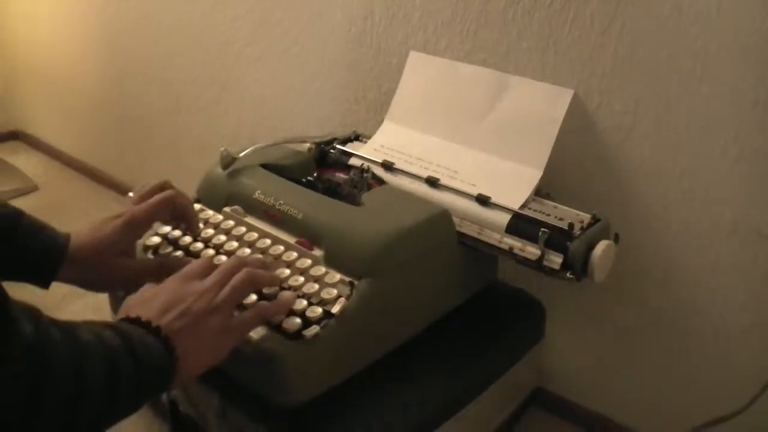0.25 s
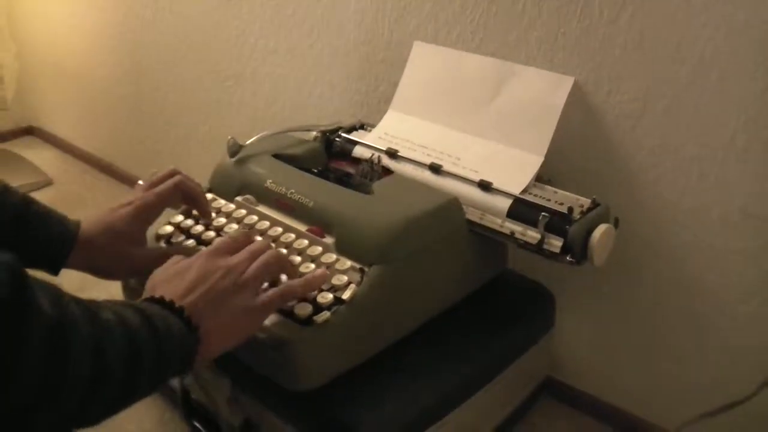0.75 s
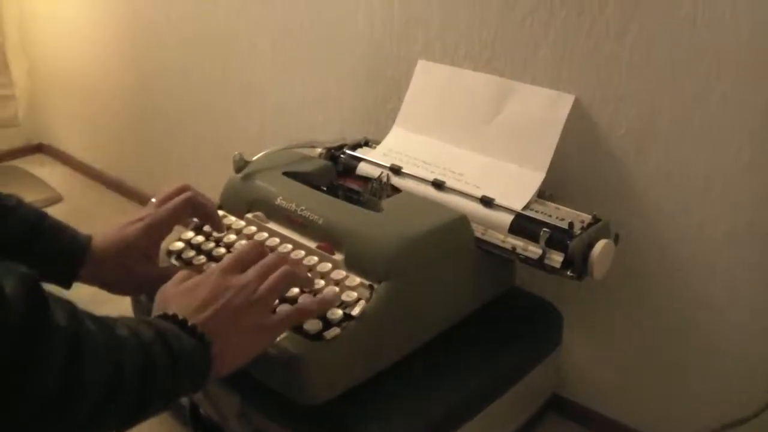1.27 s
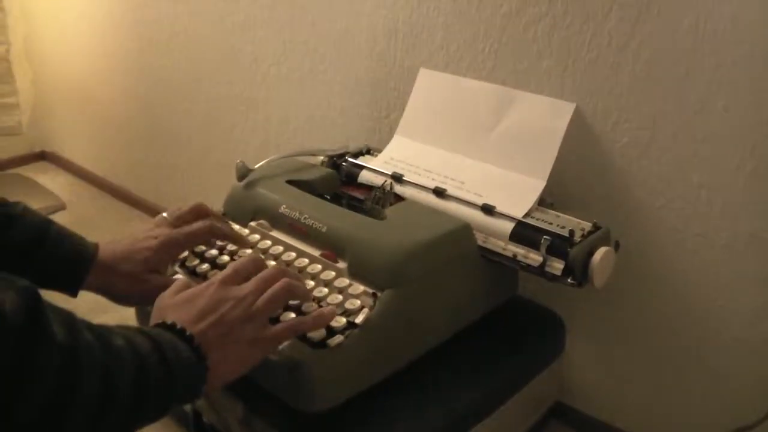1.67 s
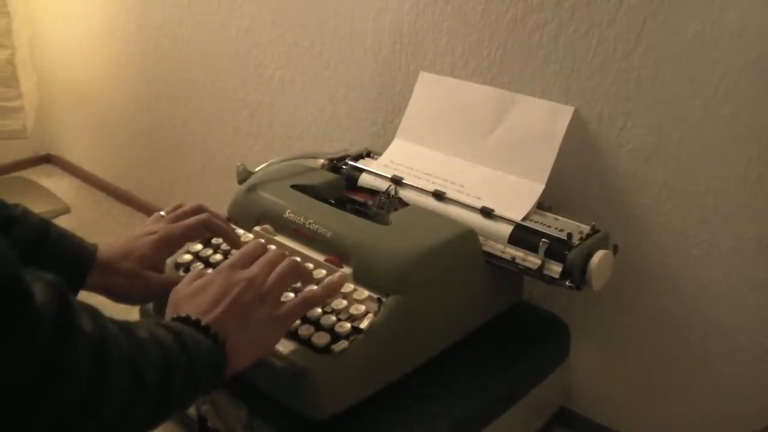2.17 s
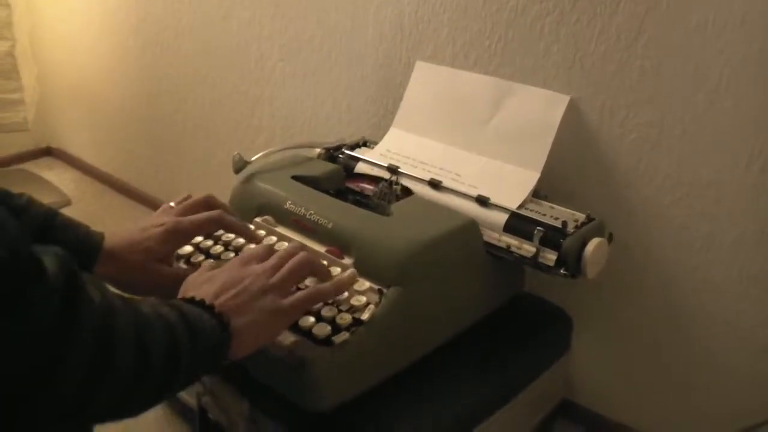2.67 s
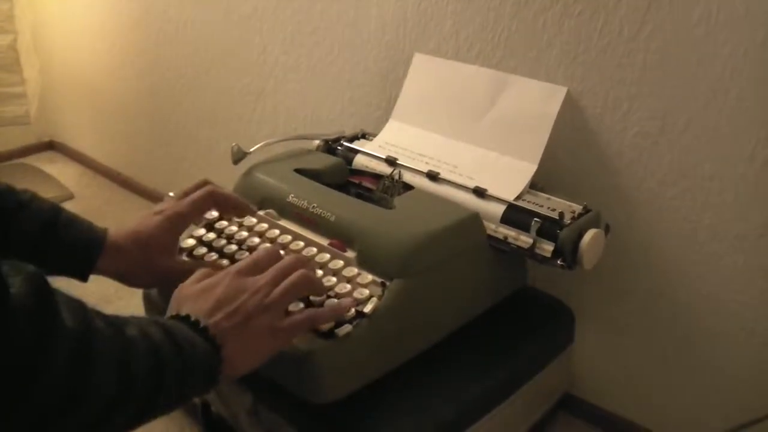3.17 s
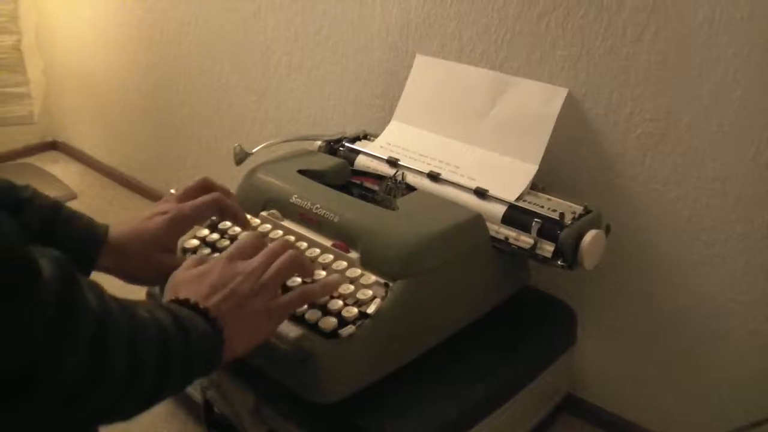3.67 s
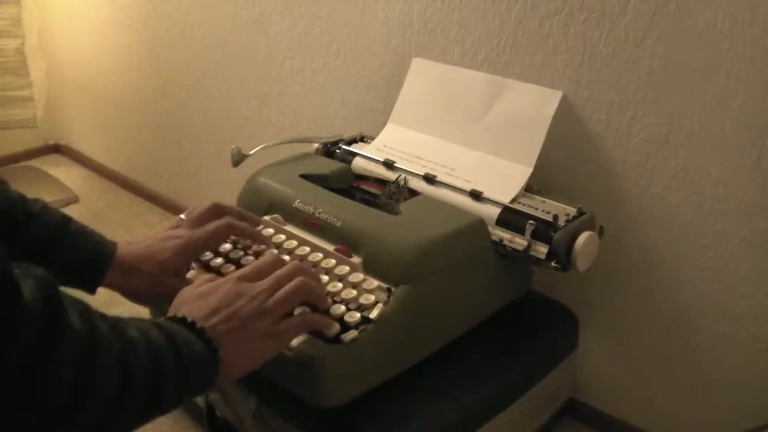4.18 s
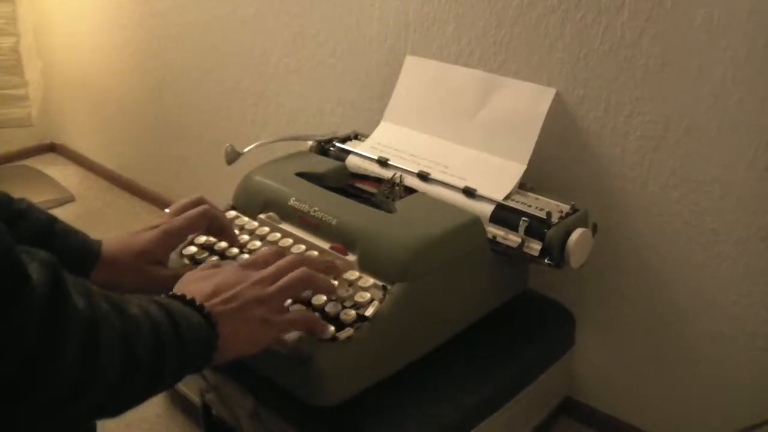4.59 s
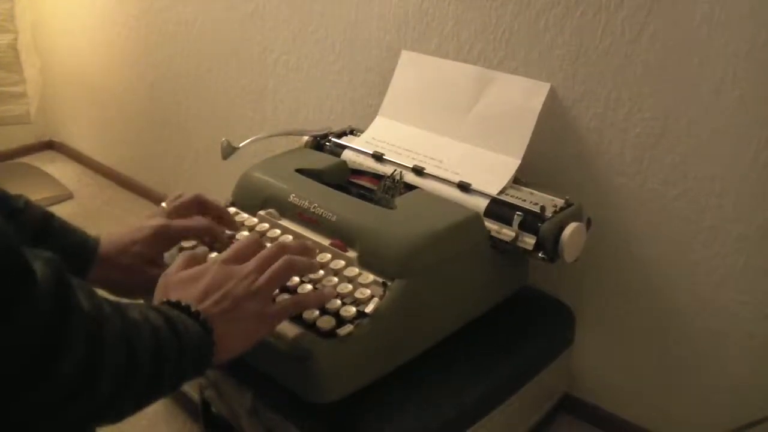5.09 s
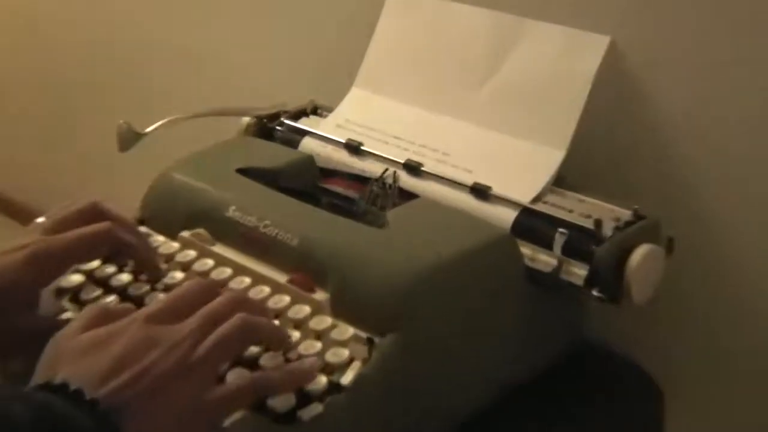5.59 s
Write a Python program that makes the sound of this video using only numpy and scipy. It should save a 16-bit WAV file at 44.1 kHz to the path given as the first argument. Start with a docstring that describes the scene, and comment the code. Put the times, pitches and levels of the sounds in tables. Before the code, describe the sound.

Close, loud typing on an electric typewriter in a small, hard-walled room. Each key gives a light mechanical rattle, a sharp crack on the roller, and a quick clatter as the bar falls back. Spaces clunk and bounce between runs of letters, and one deep shift thump booms past four seconds. A low motor hum fills the pauses; the microphone ducks and clips slightly on peaks.

```python
"""Electric typewriter in a small room

Each key lets the power roller fling a type bar, which cracks against the platen and falls back;
the ceiling and walls answer every crack. Space bar, carriage and shift clunk in between, as filtered
noise bursts and struck modes, over the motor's wavering sine hum and a bed of coloured noise.
A gain control ducks after loud peaks, and what outruns it clips."""
import sys
import numpy as np
from scipy import signal
from scipy.fft import rfft, irfft, next_fast_len
from scipy.io import wavfile
from scipy.ndimage import minimum_filter1d, map_coordinates

SR = 44100
rng = np.random.default_rng(int(sys.argv[2]) if len(sys.argv) > 2 else 0)


def to_wav(s):
    """Save 16-bit WAV."""
    ch = np.atleast_2d(s).T  # columns
    pcm = np.round(np.clip(ch, -1, 1) * 32767)  # PCM
    wavfile.write(sys.argv[1], SR, pcm.astype(np.int16))


N = 257544
TIME = np.arange(N) / SR

# Levels in the tables are relative: each layer trims them further.
# Letters typed: [strike t/s, strike level/dB, linkage drive level/dB, frame knock level/dB]
LETTERS = [(-.036, 7, -39, -23), (0.1117, 17, -24.5, -27), (0.4262, 15.5, -15.5, -19.5),
           (0.583, 13.5, -16.5, -21.5), (0.7156, 14, -19.5, -24), (0.8858, 9.5, -16, -20),
           (1.431, 14, -17.5, -20.5), (1.6163, 12, -17, -17.5), (1.8015, 13.5, -16, -21.5),
           (1.947, 13.5, -23.5, -21.5), (2.12, 13.5, -19, -17.5), (2.2068, 12.5, -23, -28),
           (2.4368, 13.5, -14.5, -18.5), (2.5227, 12, -18.5, -23), (2.7118, 12.5, -20.5, -18),
           (3.4537, 11, -15, -19), (3.627, 14, -16.5, -18), (3.726, 12.5, -26, -31),
           (3.9166, 16, -18.5, -18.5), (4.374, 14, -18.5, -17.5), (4.79, 16, -19, -20),
           (4.8349, 15, -40, -36), (5.0194, 11.5, -17.5, -19), (5.1943, 16, -17, -23.5),
           (5.6348, 12, -18, -22.5), (5.752, 13, -22.5, -27.5), (5.827, 14, -39, -36)]
# Resonances of the cast frame: [f/Hz, width/Hz, level/dB]
FRAME_MODES = [(345, 30, -3), (455, 34, 2), (522, 35, -4), (640, 55, -7), (767, 55, .5), (870, 60, -4),
               (955, 50, -7), (1185, 40, -10), (1312, 35, -7)]
# The case booming on its stand: [f/Hz, level/dB, t60/s]
STAND_MODES = [(150.8, -5, 0.26), (222.2, -11.5, 0.11), (341.1, -6.5, 0.14)]
# The stand itself rocking: [f/Hz, level/dB, t60/s]
SWAY_MODES = [(58, -27, 0.15), (90, 2, 0.21)]
# Carriage rails and springs: [f/Hz, level/dB, t60/s]
SPRING_MODES = [(1610, -5, .09), (2186, -9, .07), (2850, -1, .085), (3623, -5, .08), (4314, -7, .07),
                (4775, -5, .08), (7311, -11, .06), (8554, -9, .06)]
# Broad colour of a crack on the platen: [f/Hz, level/dB]
CRACK_COLOUR = [(100, -44), (500, 1.5), (900, -20), (1300, -12.5), (2400, -5.5), (3100, -7.5), (3900, -1.5),
                (5200, 0), (6200, -1.5), (7200, -3), (9500, -6), (12500, -14.5), (15000, -9.5)]

SWING_S = .0315  # from the cam's catch to the strike


def amp(db):
    """Decibels to linear gain."""
    return 10 ** (np.asarray(db) / 20)


def unit(x):
    """Scale to an RMS of 1."""
    return x / np.sqrt(np.mean(x ** 2) + 1e-20)


def along(points, hz):
    """Interpolate (f/Hz, value) points on a log frequency axis."""
    f, v = np.transpose(points)
    return np.interp(np.log(hz + 1), np.log(f + 1), v)


def wobble(rate):
    """A smooth random curve with `rate` knots a second."""
    steps = np.arange(0, N, 8)
    knots = rng.standard_normal(int(N * rate / SR) + 4)
    curve = map_coordinates(knots, [steps * rate / SR])
    return np.interp(np.arange(N), steps, curve)


def filtered(x, response):
    """Multiply the spectrum of x by a response of frequency."""
    n = x.shape[-1]
    m = next_fast_len(n + 8192)
    hz = np.fft.rfftfreq(m, 1 / SR)
    return irfft(rfft(x, m) * response(hz), m)[..., :n]


def causal(points, size=1024):
    """The minimum-phase click of a spectrum: its energy comes as early as possible."""
    hz = np.fft.rfftfreq(size, 1 / SR)
    cepstrum = irfft(np.log(amp(along(points, hz))))
    # fold the cepstrum onto positive times
    cepstrum[1:size // 2] *= 2
    cepstrum[size // 2 + 1:] = 0
    return irfft(np.exp(rfft(cepstrum)))


def convolved(x, response):
    """Convolve both channels, keeping the length of the track."""
    return signal.fftconvolve(x, response, axes=1)[:, :N]


def noise_pair(n):
    """Stereo white noise: nearly alike in the bass, wider in the treble."""
    # stereo width, side against mid: [f/Hz, level/dB]
    side_level = [(30, -20), (70, -50), (600, -19), (2200, -30), (4500, -9.5), (8000, -4), (13000, -4.5)]
    mid, side = rng.standard_normal((2, n))
    side = filtered(side, lambda hz: amp(along(side_level, hz)))
    return np.array([mid + side, mid - side])


def coloured(x, points):
    """Give x a broad colour that keeps the power of white noise."""
    click = causal(points)
    click = click[None] / np.linalg.norm(click)
    return signal.fftconvolve(x, click, axes=1)[:, :x.shape[1]]


def ringing(x, modes):
    """Pass x through parallel resonances of alternating sign that keep the power of white noise."""
    def response(f):
        total = 0
        for k, (centre, width, db) in enumerate(modes):
            damping = 1j * f * width
            total = total + (-1) ** k * amp(db) * damping / (centre ** 2 - f ** 2 + damping)
        return total / np.sqrt(np.mean(np.abs(total) ** 2) + 1e-20)
    return filtered(x, response)


def ring(modes, rise, scatter_db=2):
    """Modes set ringing by one push, at new strengths and slightly new pitches each time."""
    hz, db, t60 = np.transpose(modes)[:, :, None]
    t = TIME[:int(t60.max() * SR)]
    size = amp(db + scatter_db * rng.standard_normal(db.shape))
    hz = hz * (1 + .006 * rng.standard_normal(hz.shape))
    decay = np.exp(-np.log(1000) * t / t60)
    tone = np.sum(size * decay * np.sin(2 * np.pi * hz * t), axis=0)
    return np.pad((1 - np.exp(-t / rise)) * tone, (0, SR // 4))[:SR // 4]


def burst(db, rise, t60, hold=0):
    """Power of a rattle that builds, holds and dies."""
    t = TIME[:SR // 3]
    build = (1 - np.exp(-t / rise)) ** 2
    decay = np.exp(-np.log(1e6) * np.maximum(t - hold, 0) / t60)
    return amp(db) ** 2 * build * decay


def rattle(power, grain_db):
    """Noise of uneven size under a power envelope, like many tiny contacts."""
    grain = unit(amp(grain_db * wobble(600)))
    return np.sqrt(power) * grain * noise_pair(N)


def add(track, s, sound):
    """Mix a sound into a track at a time in seconds."""
    i = round(s * SR)
    part = sound[..., max(-i, 0):max(N - i, 0)]
    track[..., max(i, 0):max(i, 0) + part.shape[-1]] += part


def room_tail(grain_db=3):
    """The walls' answer, of energy 1 at left: uneven reflections, each band with its own decay."""
    # the room's decay: [f/Hz, t60/s]
    room_decay = [(150, 0.81), (1000, 0.29), (5000, 0.22), (9000, 0.21), (15000, 0.35)]
    n = SR // 2
    hz, t, z = signal.stft(noise_pair(n), SR, nperseg=256)
    decay = amp(-60 * t / along(room_decay, hz)[:, None])
    tail = signal.istft(z * decay, SR, nperseg=256)[1][:, :n]
    uneven = np.interp(TIME[:n], np.arange(500) / 1000, rng.standard_normal(500))
    tail = tail * amp(grain_db * uneven) * (1 - np.exp(-TIME[:n] / 0.024))
    return tail / np.linalg.norm(tail[0])


def strikes():
    """The slug cracks on the platen; the ceiling returns a recoloured click and the room rings on."""
    # type bar and guide, ringing under the blow: [f/Hz, level/dB, t60/s]
    slug_modes = [(3010, 6.5, 0.018), (5020, -5.5, 0.04), (5700, -2, 0.03), (6790, 6, 0.0043)]
    # colour of the ceiling's reflection: [f/Hz, level/dB]
    ceiling_colour = [(200, -27.5), (1200, -5), (3200, -8), (4300, -10.5), (5100, -3.5), (6000, -6.5),
                      (7200, -11.5), (13000, -17.5)]
    # lag of the ceiling's echo, drifting over the scene: [t/s, lag/s]
    echo_lag = [(0, .0099), (.4, .0104), (1.5, .0104), (2, .0097), (2.5, .0095), (5.8, .0094)]
    out, t = np.zeros((2, N)), TIME[:SR // 40]
    ceiling = causal(ceiling_colour)[None]
    click = coloured(signal.unit_impulse(len(t))[None], CRACK_COLOUR)
    for s, db, *_ in LETTERS:
        # the blow itself, the ring of the type bar, and its scatter off the nearby metal
        bar_ring = ring(slug_modes, rise=.0001)[:len(t)]
        scatter = coloured(noise_pair(len(t)), CRACK_COLOUR) * amp(-60 * t / 0.026)
        crack = amp(db - 1) * (0.96 * click + 0.089 * bar_ring + 0.25 * scatter)
        add(out, s, crack)
        lag = np.interp(s, *np.transpose(echo_lag))
        add(out, s + lag, amp(6) * signal.fftconvolve(crack, ceiling, axes=1))
        reflected = signal.fftconvolve(click, ceiling)
        add(out, s, amp(db + 16) * signal.fftconvolve(reflected, room_tail(grain_db=3.5), axes=1))
    return out


def mechanism():
    """Cams, levers and carriage shake the steel linkage, the frame and the stand."""
    # resonances of levers and type bars: [f/Hz, width/Hz, level/dB]
    steel_modes = [(2276, 94, -6.5), (2786, 26, -1), (3100, 130, -8), (3337, 120, -3.5), (3575, 360, -3.5),
                   (4020, 540, -8), (4270, 37, 0), (4730, 43, 3), (4920, 105, -7), (5276, 190, -3),
                   (5476, 270, -4.5), (5910, 210, -8.5)]
    # broad colour of the clattering linkage: [f/Hz, level/dB]
    clatter_colour = [(200, -5.5), (700, -5), (1600, 1.5), (2100, -1.5), (3300, -0.5), (5300, -3.5),
                      (6600, -5.5), (8300, -5.5), (9600, -9.5), (10800, -9), (12200, -15), (15000, -18)]
    # broad colour of knocks in the casting: [f/Hz, level/dB]
    knock_colour = [(30, -26), (180, -13), (330, -1.5), (800, 1.5), (1500, -11.5), (3000, -5.5),
                    (8000, -40)]
    # steel and frame are power envelopes; tones and chime are already sound
    steel, frame, tones, chime = letters() + spaces() + shift()
    clatter = amp(-4.5) * rattle(steel, grain_db=0.5) + amp(-8) * ticks(steel)
    linkage = coloured(clatter, clatter_colour)
    linkage = linkage + amp(-4) * ringing(rattle(steel, grain_db=4), steel_modes)
    casting = amp(-2) * ringing(rattle(frame, grain_db=2.5), FRAME_MODES)
    casting = casting + amp(-3) * coloured(rattle(frame, grain_db=0), knock_colour)
    # the rings come from inside the case and arrive as much by way of the walls as directly
    rings = .7 * (chime + convolved(chime[None], room_tail()))
    near = linkage + casting
    return near + rings + tones + amp(-10) * convolved(near, room_tail())


def letters():
    """Finger, cam, ribbon lift and the bar's return: the same chain of contacts for every letter."""
    # a type bar shivering in its basket: [f/Hz, level/dB, t60/s]
    bar_modes = [(2320, -2, .08), (3135, -1, .07), (3415, -2, .08), (4885, 0, .1), (5940, -4, .07)]
    # the finger lands before the cam catches; the other times follow the strike
    finger_lead_s, fall_s, settle_s, reset_s = 0.017, .043, .07, 0.125
    fall_db = -22
    steel, frame, tones, chime = np.zeros((4, N))
    thump = ring(STAND_MODES, rise=0.0079, scatter_db=6)  # one boom shared by all letters
    for s, _, drive_db, knock_db in LETTERS:
        cam = s - SWING_S
        # the finger lands on the key top
        finger = cam - finger_lead_s
        add(steel, finger, burst(drive_db - 8.5, 0.0025, 0.15, hold=0.012))
        add(frame, finger, burst(knock_db - 13, 0.0043, 0.14, hold=0.0037))
        # the cam snaps onto the roller a fixed time before the strike and drives the bar up
        add(steel, cam, burst(drive_db + 4.5, 0.00055, 0.017, hold=0.0055))
        add(steel, cam, burst(drive_db, 0.0091, 0.34, hold=0.027))
        add(frame, cam, burst(knock_db + 0.28, 0.0011, 0.018, hold=0.024))
        add(tones, cam, amp(knock_db - 5.5) * thump + amp(knock_db) * knock())
        add(chime, cam, amp(drive_db - 2.5) * ring(bar_modes, rise=0.0013))
        add(chime, cam, amp(drive_db - 12.5) * lever())
        # the ribbon lifts and the escapement trips just ahead of the strike
        add(steel, s - .007, burst(-14.5, 0.0018, 0.019, hold=0.0033))
        # the bar drops back into its basket
        fall = s + fall_s
        add(steel, fall, burst(fall_db - 6, 0.0028, 0.77))
        add(chime, fall, amp(fall_db - 2.5) * ring(bar_modes, rise=0.0012))
        add(chime, fall, amp(fall_db - 3) * lever())
        add(frame, fall, burst(fall_db + 1, 0.008, 0.1, hold=0.008))
        # its lever settles
        add(tones, s + settle_s, amp(-21.5) * thump)
        add(frame, s + reset_s, burst(-21.5, 0.032, 0.15))
    return np.array([steel, frame, tones, chime])


def lever(count=18):
    """The brief, inharmonic ring of a key's lever, at pitches drawn anew each time."""
    low_hz, high_hz, t60_s, db_per_octave = 1900, 11720, 0.038, -1.5
    octaves = rng.uniform(0, np.log2(high_hz / low_hz), count)
    modes = [(low_hz * 2 ** o, db_per_octave * o, t60_s) for o in octaves]
    return ring(modes, rise=0.003, scatter_db=4)


def knock():
    """One firm blow on the cast frame; the narrower a resonance, the longer it rings."""
    modes = [(hz, db, np.log(1000) / (np.pi * width)) for hz, width, db in FRAME_MODES]
    return ring(modes, rise=0.0068, scatter_db=5.5)


def ticks(power):
    """Sparse random contacts of loose parts, each a tiny rattle, as strong as the linkage shakes."""
    ticks_per_s, spread_db, t60_s = 70, 0.5, 0.02
    hits = (rng.random(N) < ticks_per_s / SR) * amp(spread_db * rng.standard_normal(N))
    envelope = signal.fftconvolve(hits, amp(-60 * TIME[:SR // 20] / t60_s))[:N]
    return np.sqrt(power) * unit(envelope) * noise_pair(N)


def spaces():
    """The bar goes down, the escapement trips and rocks the stand, the carriage bounces on its stop."""
    # [bar pressed t/s, press level/dB, escapement trips t/s, carriage stops t/s, stop level/dB]
    space_strokes = [(0.194, -16.5, .24, .336, -20), (1.01, -13, 1.061, 1.117, -15.5),
                     (2.87, -12, 2.926, 2.963, -17), (3.998, -16, 4.042, 4.125, -17.5),
                     (5.277, -16.5, 5.331, 5.394, -17)]
    trip_db, clunk_t60_s = -17, 0.26
    bounce_s, bounce_loss_db = .034, 3  # time between contacts, loss at the first bounce
    steel, frame, tones, chime = np.zeros((4, N))
    for press, press_db, trip, stop, stop_db in space_strokes:
        add(steel, press, burst(press_db, 0.0012, clunk_t60_s, hold=0.004))
        add(frame, press, burst(press_db - 4.5, 0.016, clunk_t60_s, hold=0.008))
        add(tones, press, amp(press_db - 8) * ring(STAND_MODES, rise=0.0024, scatter_db=3.5))
        add(steel, trip, burst(trip_db, 0.00034, clunk_t60_s, hold=0.0024))
        add(frame, trip, burst(trip_db - 5, 0.0019, clunk_t60_s, hold=0.006))
        add(tones, trip, amp(trip_db - 8) * ring(SWAY_MODES, rise=0.016))
        add(tones, stop, amp(stop_db + 1) * ring(STAND_MODES, rise=0.013, scatter_db=0.5))
        for k in range(3):
            # each bounce loses more than the last
            s = stop + k * bounce_s
            db = stop_db - bounce_loss_db * k * (k + 1) / 2
            add(steel, s, burst(db - 0.5, 0.00071, 0.14, hold=0.0041))
            springs = ring(SPRING_MODES, rise=0.00088, scatter_db=2)
            add(chime, s, amp(db + 0.5 - 8.3 * k) * springs)
    return np.array([steel, frame, tones, chime])


def shift():
    """The heavy type basket drops and comes back; each blow booms through the stand."""
    # blows on the way down and back up: [t/s, rattle level/dB, stand boom level/dB]
    shift_blows = [(4.197, -12.5, -22), (4.23, -10.5, 2.5), (4.485, -14, -17), (4.529, -17.5, -6),
                   (4.574, -14, -15), (4.62, -17, -13)]
    steel, frame, tones, chime = np.zeros((4, N))
    for s, db, boom_db in shift_blows:
        add(steel, s, burst(db - .3, 0.0004, 0.23, hold=0.0019))
        add(frame, s, burst(db - 3.5, 0.0018, 0.18, hold=0.0028))
        add(tones, s, amp(boom_db) * ring(STAND_MODES, rise=0.0074, scatter_db=2))
        add(tones, s, amp(db - 18) * knock())
        add(tones, s, amp(-32) * ring(SWAY_MODES, rise=0.016))
        add(chime, s, amp(db - 12) * ring(SPRING_MODES, rise=0.00091, scatter_db=7))
    return np.array([steel, frame, tones, chime])


def motor():
    """Hum, loudest when idle, with a thin whine, over the rush of its belt and roller."""
    # motor lines: [f/Hz, width/Hz (scales the pitch wander), idle rms level/dB]
    motor_lines = [(121.1, 6.6, -32), (239, 5.4, -49.5), (350, 11.5, -52), (540, 12, -62), (10300, 32, -54)]
    # broad colour of the rush: [f/Hz, level/dB]
    rush_colour = [(25, -17), (55, -12), (85, -5.5), (135, 10.5), (175, 3), (350, -3), (430, -13.5),
                   (800, -6), (1200, -16), (1680, -6), (2200, -19), (5200, -20), (7500, -25), (15000, -29)]
    # the hum sinks while the motor drives the keys and swells again when it idles
    full_load_db, recover_s = -6, 0.29
    load = np.zeros(N)
    for s, *_ in LETTERS:
        add(load, s - SWING_S, (1 - np.exp(-TIME / SWING_S)) * np.exp(-TIME / recover_s))
    hum = 0
    for hz, width, db in motor_lines:
        phase = 2 * np.pi * np.cumsum(hz + 0.14 * width * wobble(40)) / SR
        waver_db = .7 * wobble(26)
        hum = hum + np.sqrt(2) * amp(db + waver_db) * np.sin(phase)
    rush = amp(-39.5) * coloured(noise_pair(N), rush_colour)
    return hum * amp(full_load_db * np.minimum(load, 1)) + rush


def scene():
    """Typing and motor together, leaning left or right by frequency."""
    # left over right: [f/Hz, level/dB]
    stereo_lean = [(100, .9), (2500, .5), (5000, .2), (8500, -2.2), (13000, -1.6)]
    mix = mechanism() + strikes() + motor()
    return filtered(mix, lambda hz: amp(np.outer([.5, -.5], along(stereo_lean, hz))))


def released(cut_db, release):
    """A gain cut that follows every rise at once and then relaxes exponentially."""
    return np.exp(np.maximum.accumulate(np.log(cut_db + 1e-6) + TIME / release) - TIME / release)


def record(dry, threshold_db=-2, attack=0.0017, hold=0.0065, slow_share=0.59):
    """Gain control ducks on peaks and recovers at two rates; what outruns it clips."""
    top_hz = 15550  # nothing passes above
    level_db = 20 * np.log10(np.abs(dry).max(axis=0) + 1e-9)
    over_db = np.maximum(level_db - threshold_db, 0)
    # hold each peak for a moment, looking back only
    n = int(hold * SR) | 1
    held_db = -minimum_filter1d(-over_db, n, origin=n // 2)
    cut_db = (1 - slow_share) * released(held_db, 0.059) + slow_share * released(held_db, 0.088)
    pole = np.exp(-1 / (attack * SR))
    smooth_cut_db = signal.lfilter([1 - pole], [1, -pole], cut_db)
    ducked = dry * amp(-smooth_cut_db)
    return filtered(np.clip(ducked, -1, 1), lambda hz: hz < top_hz)


dry = scene()
out = record(dry)
to_wav(out)
```